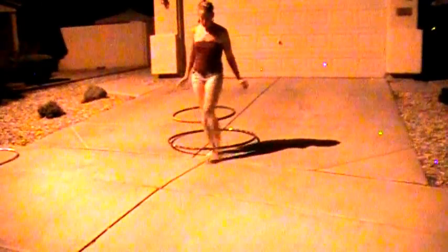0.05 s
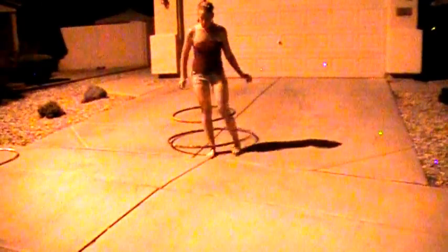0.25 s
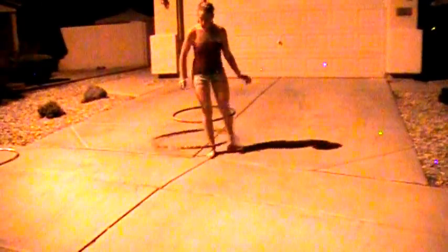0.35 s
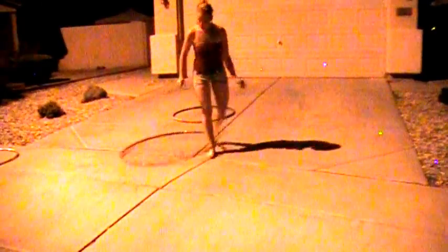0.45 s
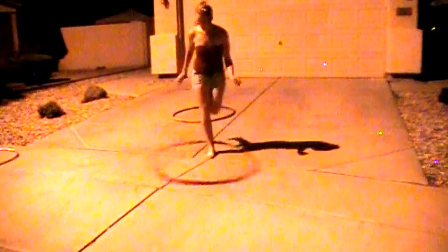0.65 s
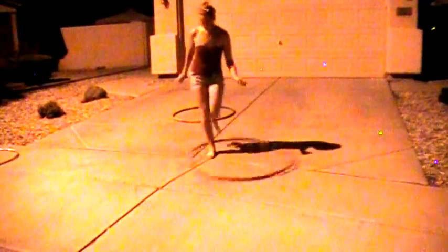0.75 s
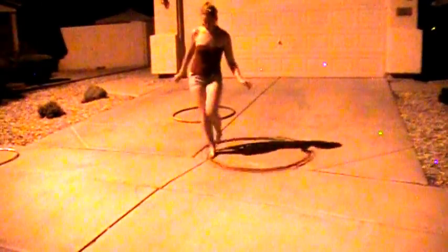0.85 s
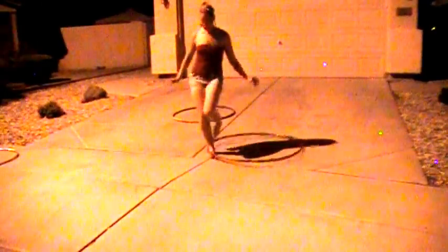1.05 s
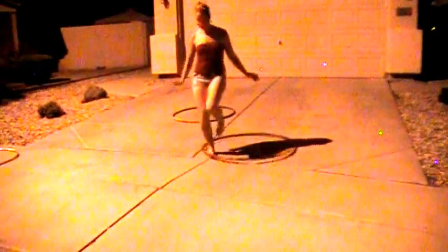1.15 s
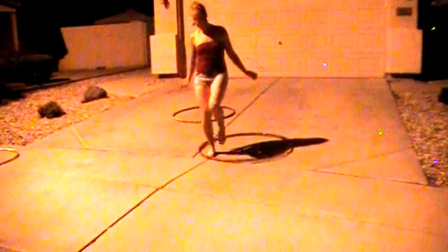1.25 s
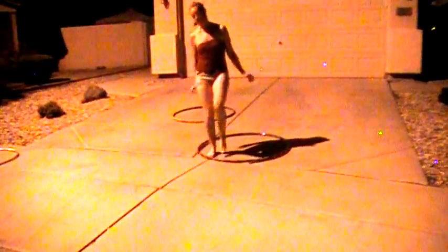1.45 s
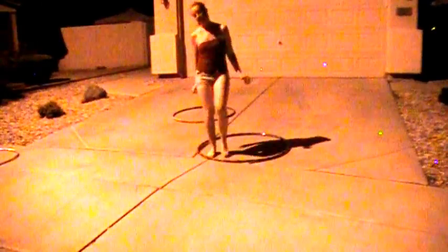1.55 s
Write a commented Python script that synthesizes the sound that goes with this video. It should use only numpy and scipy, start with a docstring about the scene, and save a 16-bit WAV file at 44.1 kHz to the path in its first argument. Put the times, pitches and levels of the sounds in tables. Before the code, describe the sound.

Plastic hoop skidding over gritty concrete, then bouncing with hollow clacks outdoors at night.

```python
"""A plastic hoop swings round an ankle on a concrete driveway at night.
Its rim skids over the grit in short hissing strokes and snaps single grains, then bounces with three
hollow clacks among lighter knocks, each ringing the tube. Feet pat the slab and the garage wall throws
an echo back. Behind it all, insects hiss over distant traffic and a low hum."""
import sys
import numpy as np
from scipy import signal
from scipy.fft import rfft, irfft, next_fast_len
from scipy.io import wavfile

SR = 44100
rng = np.random.default_rng(int(sys.argv[2]) if len(sys.argv) > 2 else 0)


def generate_wav(sig):
    """Save sig (samples, or channels by samples) to the path in sys.argv[1] as 16-bit PCM at SR."""
    pcm = np.round(np.clip(np.atleast_2d(sig).T, -1, 1) * 32767).astype(np.int16)
    wavfile.write(sys.argv[1], SR, pcm)


N = 70560
T = np.arange(N) / SR


def from_db(db):
    """Decibels to gain."""
    return 10 ** (np.asarray(db) / 20)


def rms_one(x):
    """Scale to rms 1."""
    return x / np.sqrt(np.mean(x ** 2) + 1e-20)


def coloured(x, curve, hz=1):
    """Minimum-phase EQ of unit energy that follows the curve, its frequencies multiplied by hz."""
    size = next_fast_len(N + SR // 4) * 2
    freqs, db = np.transpose(curve)
    bin_hz = np.arange(size // 2 + 1) * SR / size
    gain = rms_one(from_db(np.interp(np.log(bin_hz + 1), np.log(freqs * hz), db)))
    cepstrum = irfft(np.log(gain))
    cepstrum[1:size // 2] *= 2
    cepstrum[size // 2 + 1:] = 0
    return irfft(rfft(x, size) * np.exp(rfft(cepstrum)))[..., :N]


def drift(hz):
    """Random wander of rms 1, moving mostly slower than hz."""
    pole = np.exp(-2 * np.pi * hz / SR)
    return rms_one(signal.lfilter([1], [1, -2 * pole, pole * pole], rng.standard_normal(N + SR))[SR:])


def click(start):
    """One unit click."""
    return 1.0 * (np.arange(N) == int(start * SR))


def burst(start, t60):
    """Dying noise of unit energy."""
    decay = from_db(-60 * np.clip((T - start) / t60, 0, 2))
    return rms_one(rng.standard_normal(N) * (T >= start) * decay) / np.sqrt(N)


def stereo(mid, side, pan_db):
    """Left and right from mid and side; a negative pan leans right."""
    return np.array([(mid + side) * from_db(pan_db), (mid - side) * from_db(-pan_db)])


def through(x, response):
    """Convolve with an impulse response."""
    return signal.fftconvolve(x, response)[:N]


# EQ of the far roads. Each row: frequency in Hz, gain in dB.
TRAFFIC_EQ = [(20, 0), (45, -11.5), (80, -6), (125, -5), (180, 1.5), (250, -1), (400, -4.5), (530, -9.5),
              (700, -3.5), (880, 1.5), (1100, -6), (1400, -15), (2000, -25.5), (4000, -34.5), (9000, -43),
              (12000, -47.5), (16000, -53)]


def traffic(level_db=-47, side_db=-7.5):
    """Distant traffic blurs into a steady, dark wash."""
    mid, side = from_db(level_db) * coloured(rng.standard_normal((2, N)), TRAFFIC_EQ)
    return stereo(mid, from_db(side_db) * side, pan_db=-0.6)


def hum(hz=91.9, level_db=-59.5, waver_db=3.5):
    """A low tone wavers in level and phase."""
    level = np.sqrt(2) * from_db(level_db + waver_db * drift(hz=12))
    phase = 2 * np.pi * hz * T + 0.21 * drift(hz=5.6)
    return stereo(level * np.sin(phase), side=0, pan_db=-0.6)


# EQ of the insect chorus. Each row: frequency in Hz, gain in dB.
INSECT_EQ = [(5000, -29), (6400, -8), (7100, 8.5), (7700, 9.5), (8400, -15), (10000, -26)]


def insects(level_db=-63.5, flutter_db=2.5, side_db=-4):
    """Insects merge into a high, fluttering band of hiss."""
    level = from_db(level_db + flutter_db * drift(hz=30))
    mid, side = level * coloured(rng.standard_normal((2, N)), INSECT_EQ)
    return stereo(mid, from_db(side_db) * side, pan_db=0)


def grit(grains_per_s=9000, spread_db=4):
    """Dense tiny collisions of uneven size."""
    sizes = from_db(spread_db * np.minimum(rng.exponential(1, N), 4)) * rng.choice([-1, 1], N)
    return rms_one(sizes * (rng.random(N) < grains_per_s / SR))


# EQs of fine sand, coarse grains and the tube's thin wall. Each row: frequency in Hz, gain in dB.
HISS_EQ = [(60, -38.5), (300, -18), (2000, -28), (4500, -13.5), (6800, -6), (8600, -0.5), (10200, -7),
           (12000, -14.5), (13500, -18.5), (16000, -31)]
RASP_EQ = [(60, -35), (170, -1), (450, 10), (1100, 6), (1850, -5.5), (2600, 1), (4700, -6), (7000, -1.5),
           (14000, -51)]
TUBE_WALL_EQ = [(1200, -0.5), (1550, 0.5), (2000, -3.5), (2400, -0.5), (2750, 2), (3250, -2.5), (3800, 1.5),
                (4800, 3.5), (6200, -1), (7800, -0.5), (9500, 4), (14000, 0.5)]
# Strokes of the rim. Each row: start and length in seconds, hiss and rasp levels in dB,
# drop over the stroke in dB (negative swells).
SKID_STROKES = [(0.219, 0.016, -59, -59.5, 0), (0.233, .036, -52.5, -47.5, -2),
                (0.269, 0.041, -55, -83, 8.5), (0.324, 0.026, -42, -38.5, 9),
                (.35, 0.083, -44, -47.5, -2.5), (0.442, 0.023, -40, -37, 12), (0.466, .004, -34, -45, -1.5),
                (0.4696, 0.0026, -23.5, -35, 3), (0.48, 0.002, -28, -42, 10), (0.485, 0.048, -65, -41, 10),
                (0.528, 0.058, -55.5, -45.5, 11.5), (0.577, .026, -42, -36.5, 8.5),
                (.610, 0.021, -52, -48, 0), (0.679, 0.036, -33, -40.5, 1), (0.709, 0.063, -32, -46, 5),
                (0.772, 0.009, -34.5, -42.5, 1.5), (0.789, 0.18, -61, -50, 3.5),
                (0.8032, 0.005, -34.5, -43, -1), (0.812, 0.0078, -32.5, -34, 6),
                (0.848, 0.0069, -37, -39.5, 1), (0.894, 0.02, -39, -58, 8),
                (.932, 0.0037, -34.5, -33.5, -2), (0.941, .01, -45, -49, 2), (.955, 0.013, -41.5, -41, 2),
                (.971, 0.011, -48.5, -45, 3), (0.979, 0.1, -66, -56.5, 4.5),
                (1.096, 0.021, -42.5, -39.5, -1), (1.138, 0.01, -46, -38.5, 3),
                (1.163, 0.017, -46, -48, 4.5), (1.216, 0.069, -60, -47, 14)]


def skids(attack_s=0.00078, release_s=0.0032, judder_db=2):
    """The rim judders over the slab: fine sand hisses, coarser grains rasp in the tube."""
    hiss_level, rasp_level = 0, 0
    for start, length, hiss_db, rasp_db, drop_db in SKID_STROKES:
        attack = np.clip((T - start) / attack_s, 0, 1)
        release = np.exp(-np.clip((T - start - length) / release_s, 0, 20))
        stroke = attack * release * from_db(-drop_db * np.clip((T - start) / length, 0, 1))
        hiss_level = np.hypot(hiss_level, from_db(hiss_db) * stroke)   # overlaps add in power
        rasp_level = np.hypot(rasp_level, from_db(rasp_db) * stroke)
    judder = rms_one(from_db(judder_db * drift(hz=133)))
    hiss = coloured(grit() * judder * hiss_level, HISS_EQ)
    rasp = coloured(grit() * judder * rasp_level, RASP_EQ)
    return hiss + coloured(rasp, TUBE_WALL_EQ)


# EQ of plastic hitting concrete. Each row: multiple of the crack's pitch, gain in dB.
CRACK_EQ = [(.012, -26.5), (.04, -5.5), (.2, -1.5), (.4, -3), (.7, -1.5), (1, 3), (1.25, -2), (1.5, -9),
            (1.85, -7), (2.3, -16), (3, -43)]
# Resonances of the tube. Each row: frequency in Hz, level in dB, seconds to fall 60 dB.
TUBE_MODES = [(342, -16.5, .16), (440, -11, 0.053), (473, -3.5, 0.057), (612, -14, 0.076), (780, -1, 0.052),
              (994, -9.5, 0.071), (1069, -8.5, 0.076), (1440, -7.5, 0.044), (1630, -11, 0.019),
              (2174, -15, 0.032), (2740, -15, .022)]
# Landings of the hoop. Each row: start in seconds, ring level in dB, ring tilt in dB per octave,
# favoured pitch in Hz, crack level in dB, crack pitch in Hz.
LANDINGS = [(.2240, -46, -11, 340, -41, 6000), (0.444, -39.5, -1.5, 470, -14.5, 4250),
            (0.5758, -42.5, 2, 474, -16.5, 3120), (0.6106, -43, 3, 340, -16, 2440),
            (0.8964, -23.5, 0, 2740, -3.5, 4830), (0.9337, -43, -6, 468, -15, 6900),
            (0.9785, -35.5, 2.5, 1000, -23.5, 6500), (1.0979, -24, 1, 454, -2, 3850),
            (1.1207, -33.5, 2, 1066, -14, 2800), (1.139, -32, -2, 1440, -12.5, 3390),
            (1.1641, -27, -0.5, 1080, -23, 4960), (1.2178, -33, -3.5, 440, -26, 5850),
            (1.221, -31, 0.5, 470, -18, 4840), (1.2978, -34, 11.5, 760, -36, 4630),
            (1.3020, -23, -0.5, 1650, 2, 5100), (1.2640, -42, -4, 470, -35, 5040),
            (1.386, -50.5, 5, 2100, -28, 2920), (1.488, -47, 1, 1440, -42, 4200),
            (1.544, -50.5, 0, 770, -43, 4170)]


def knocks(rock_s=0.00031, favour_db=7, favour_octaves=0.25, spread_db=0.7):
    """Each landing cracks and sets the tube ringing; the point of contact favours some modes."""
    cracks = 0
    for start, _, _, _, db, hz in LANDINGS:
        touch = from_db(-4.5) * burst(start - rock_s, t60=.002)   # the rim touches just before it lands
        gritty_tail = from_db(-7.5) * burst(start, t60=0.022)
        cracks += from_db(db) * coloured(click(start) + touch + gritty_tail, CRACK_EQ, hz)
    clacks = coloured(cracks, TUBE_WALL_EQ)
    pivot_hz = np.exp(np.mean(np.log(np.array(TUBE_MODES)[:, 0])))
    for k, (hz, mode_db, t60) in enumerate(TUBE_MODES):
        blows = 0
        for start, ring_db, tilt, favoured_hz, _, _ in LANDINGS:
            boost_db = favour_db * np.exp(-(np.log2(hz / favoured_hz) / favour_octaves) ** 2)
            blow_db = ring_db + tilt * np.log2(hz / pivot_hz) + boost_db + rng.normal(0, spread_db)
            blows += from_db(blow_db) * click(start)
        radius, angle = from_db(-60 / (t60 * SR)), 2 * np.pi * hz / SR
        ring = signal.lfilter([.5, 0, -.5], [1, -2 * radius * np.cos(angle), radius ** 2], blows + 1e-18)
        clacks += (-1) ** k * from_db(mode_db) * ring   # neighbouring modes alternate in polarity
    return clacks


# EQ of a sole on concrete. Each row: multiple of the pat's pitch, gain in dB.
PAT_EQ = [(.05, -33), (.15, -28), (.42, -13), (.58, 9), (.75, -5), (1, 6), (1.2, -7.5), (1.7, -22),
          (5, -50)]
# Footfalls. Each row: start in seconds, level in dB, pitch in Hz.
FOOTFALLS = [(0.234, -13.5, 1100), (.3272, -4.5, 1380), (0.445, -11, 1425)]


def pats():
    """A sole meets the slab with a short, hollow slap."""
    return sum(from_db(db) * coloured(click(start), PAT_EQ, hz) for start, db, hz in FOOTFALLS)


# EQ of a snapping grain. Each row: multiple of the tick's pitch, gain in dB.
TICK_EQ = [(.008, -30.5), (.04, -9.5), (.12, -31), (.22, -20.5), (0.331, -11.5), (.7, -11), (1, -3.5),
           (1.25, -5), (1.5, -19.5), (2, -30)]
# Grains that catch the rim. Each row: start in seconds, level in dB, pitch in Hz.
GRAIN_SNAPS = [(.2392, -22.5, 7400), (0.3271, -16.5, 7900), (0.4513, -18, 8000), (0.46, -8, 7500),
               (.4742, -4.5, 9600), (0.48, -8.5, 9500), (0.4971, -7.5, 6900), (.5757, -9, 8400),
               (0.5854, -18, 6900), (.5900, -11, 8370), (0.6106, -11, 6800), (0.6492, -23.5, 4940),
               (0.6743, -5.5, 8300), (.7598, -12.5, 7260), (0.8299, -17, 8400), (0.8501, -16.5, 8600),
               (.9125, -23, 6040), (.9185, -21, 8460), (1.1289, -21, 7000), (1.3003, -19, 7050)]


def ticks():
    """Single grains snap under the rim and crumble."""
    snaps = 0
    for start, db, hz in GRAIN_SNAPS:
        crumble = from_db(-3.5) * burst(start, t60=0.014)
        snaps += from_db(db) * coloured(click(start) + crumble, TICK_EQ, hz)
    return snaps


def yard_tail(split_hz=6400):
    """Impulse response of the yard: scattered sound, the treble dying first."""
    low = signal.sosfilt(signal.butter(2, split_hz, fs=SR, output="sos"), burst(.005, t60=.45))
    high = signal.sosfilt(signal.butter(2, split_hz, "high", fs=SR, output="sos"), burst(.005, t60=.29))
    return low + high


# EQs of the echoes, the yard's reverb and the stereo spread. Each row: frequency in Hz, gain in dB.
ECHO_EQ = [(200, 1.5), (1300, 2), (2800, 2), (5000, -1), (9000, -6.5), (15000, -8)]
YARD_EQ = [(200, 3), (1200, 3), (2600, -2), (5500, -7.5), (9000, -4.5), (15000, -22)]
WIDTH_EQ = [(200, 1), (1000, -1.5), (2500, -11), (5000, -15), (8500, 4), (14000, 0.5)]
# Slapback off the walls. Each row: delay in seconds, level in dB, seconds for its smear to fall 60 dB.
WALL_ECHOES = [(0.0315, -19.5, 0.019), (0.0391, -25.5, .02)]


def driveway(direct, send_db=-20, width_db=-18):
    """Walls return smeared echoes, and the open yard adds a faint, wide tail."""
    reflections = sum(from_db(db) * burst(delay, t60) for delay, db, t60 in WALL_ECHOES)
    echoes = through(coloured(direct, ECHO_EQ), reflections)
    send = from_db(send_db) * coloured(direct, YARD_EQ)
    mid = direct + echoes + through(send, yard_tail())
    spread = from_db(width_db) * through(coloured(direct, WIDTH_EQ), burst(0, t60=0.013))
    side = spread + .5 * through(send, yard_tail())
    return stereo(mid, side, pan_db=-0.42)


def scene():
    """Hoop and feet on the driveway, over the night ambience."""
    return driveway(knocks() + ticks() + skids() + pats()) + traffic() + hum() + insects()


def record(dry, low_cut_hz=58, high_cut_hz=15900):
    """The small microphone loses the deep bass; the top is cut steeply."""
    thin = signal.sosfilt(signal.butter(2, low_cut_hz, "high", fs=SR, output="sos"), dry)
    return signal.sosfilt(signal.ellip(10, .2, 70, high_cut_hz, fs=SR, output="sos"), thin)


dry = scene()
out = record(dry)
generate_wav(out)
```